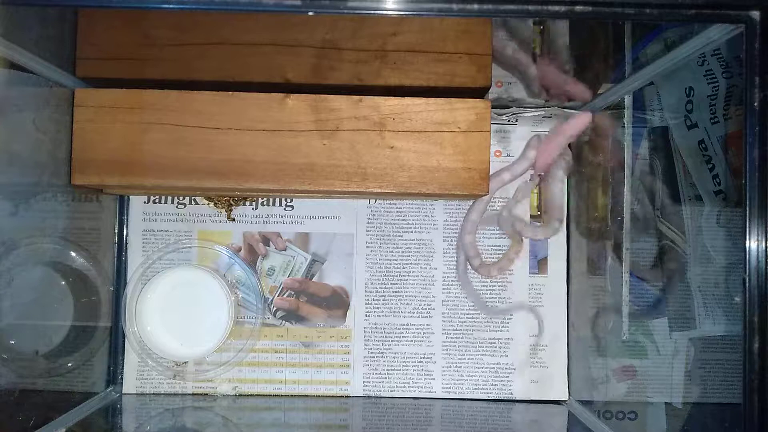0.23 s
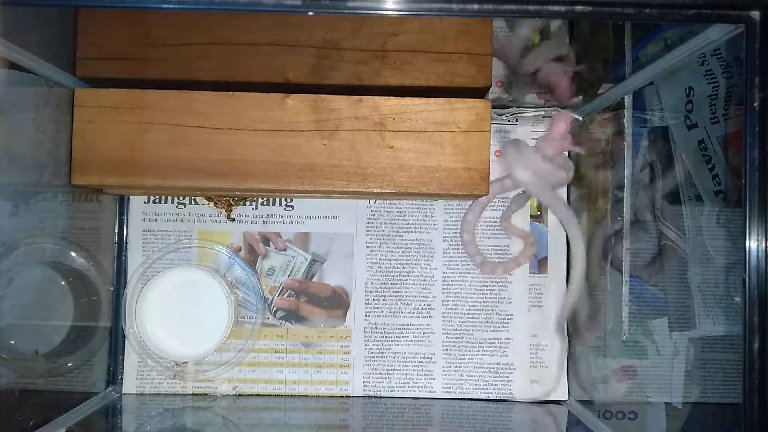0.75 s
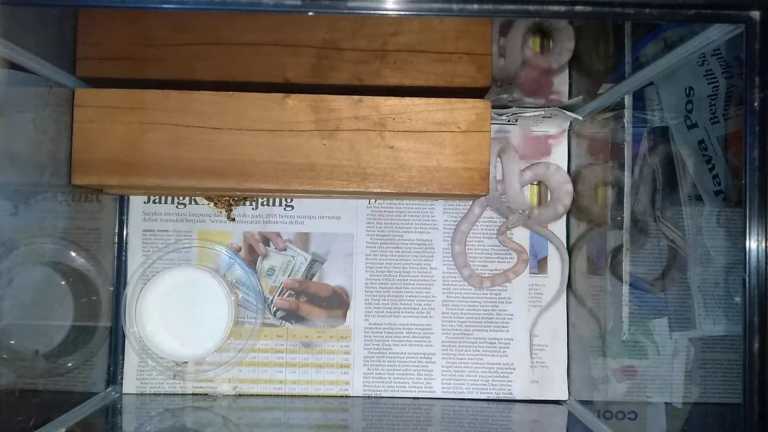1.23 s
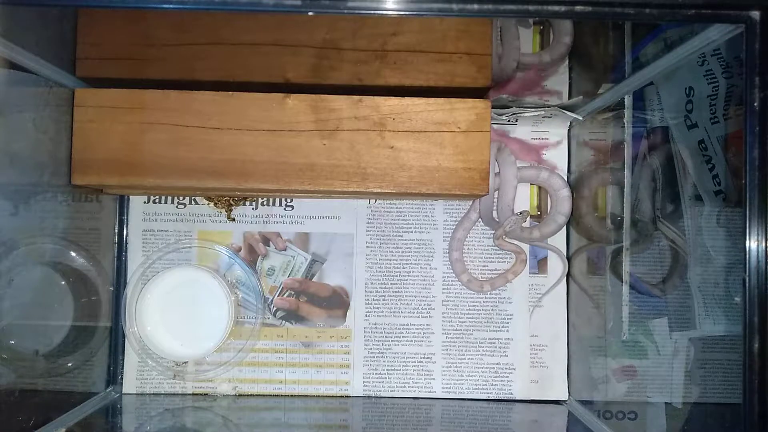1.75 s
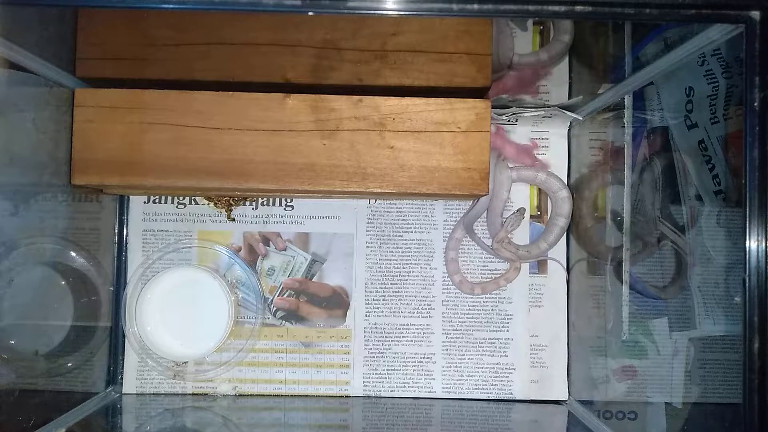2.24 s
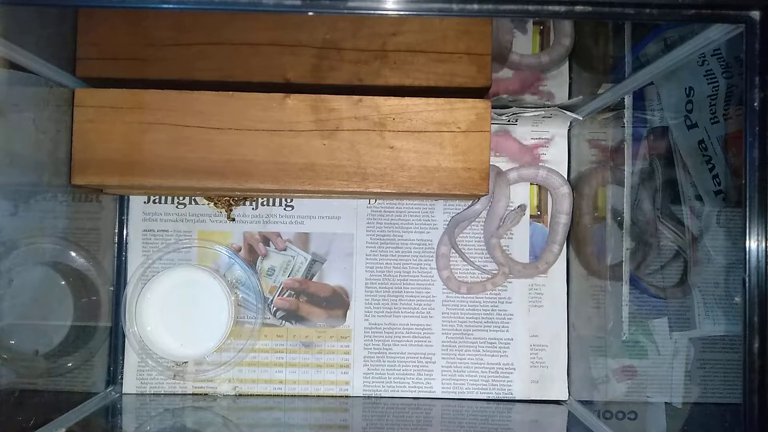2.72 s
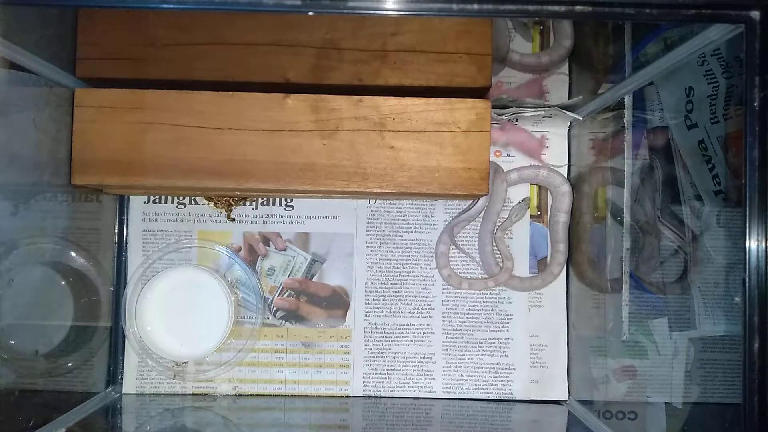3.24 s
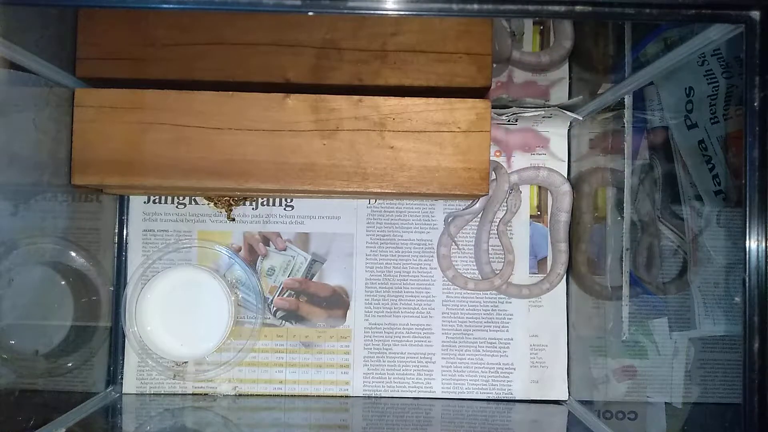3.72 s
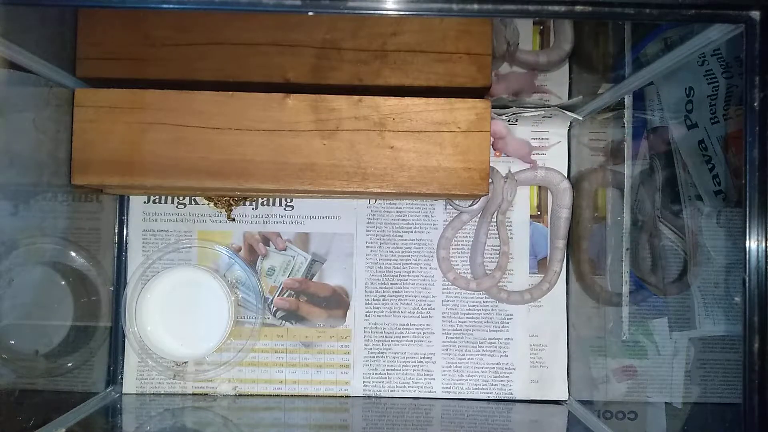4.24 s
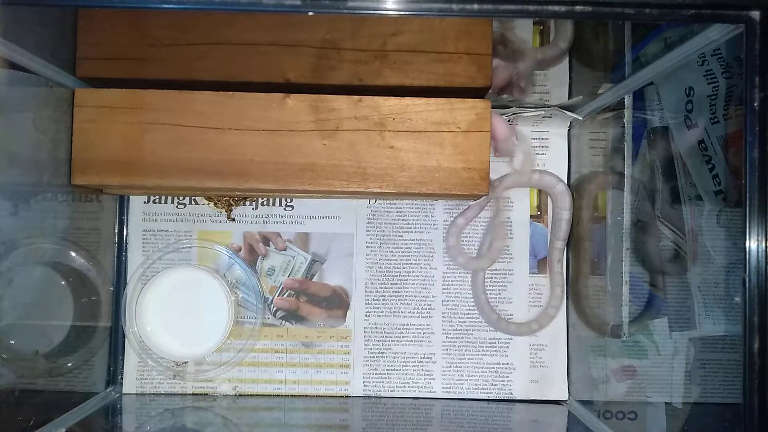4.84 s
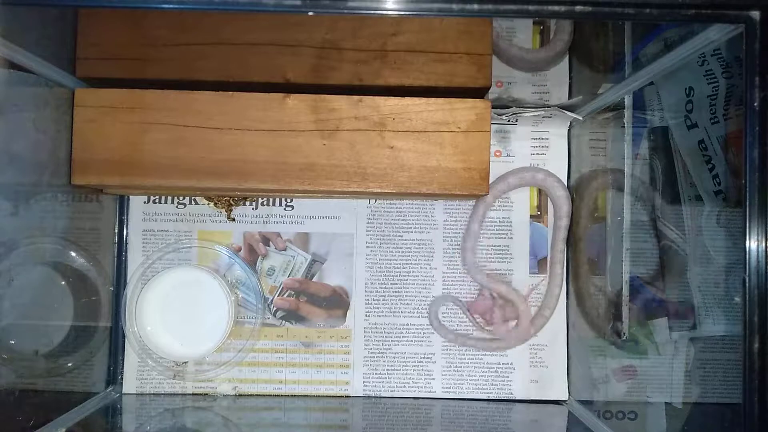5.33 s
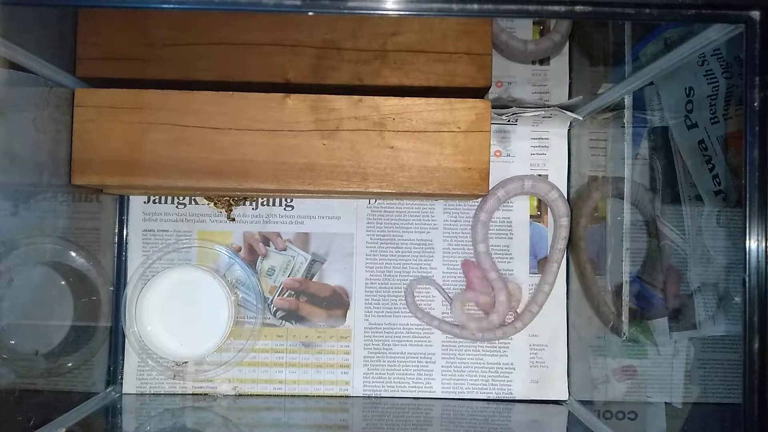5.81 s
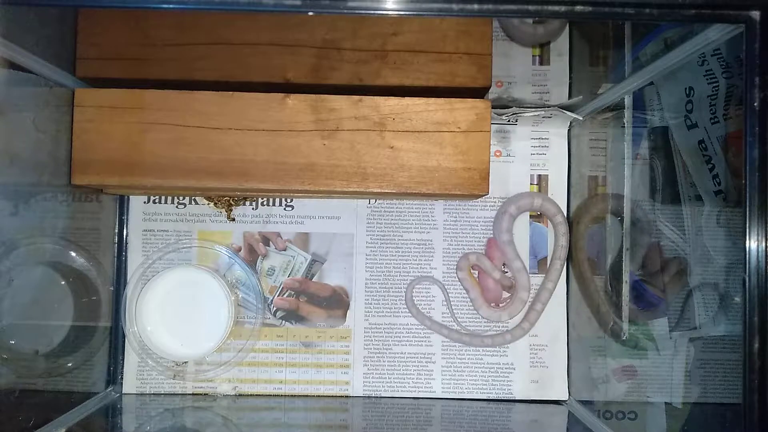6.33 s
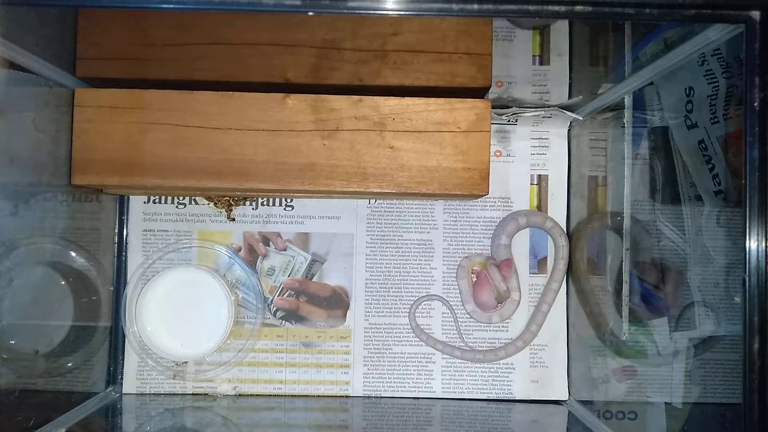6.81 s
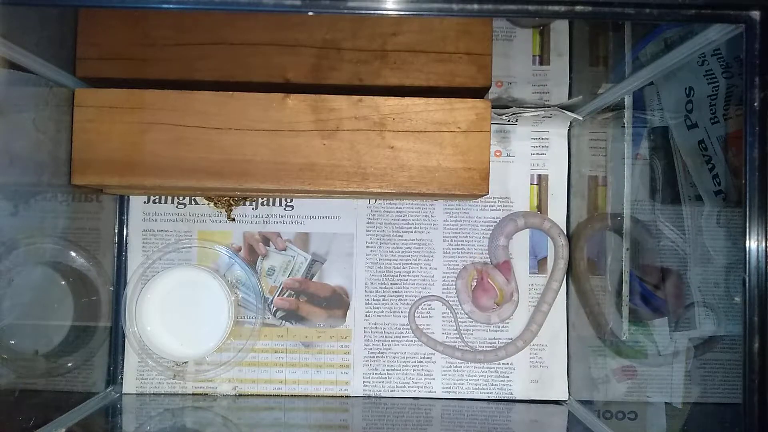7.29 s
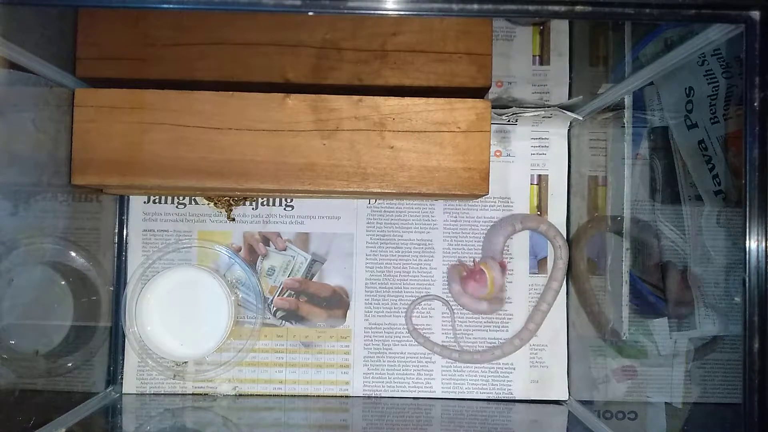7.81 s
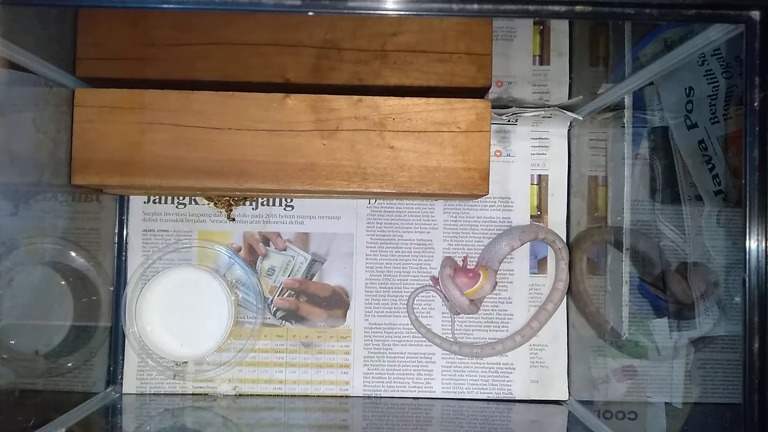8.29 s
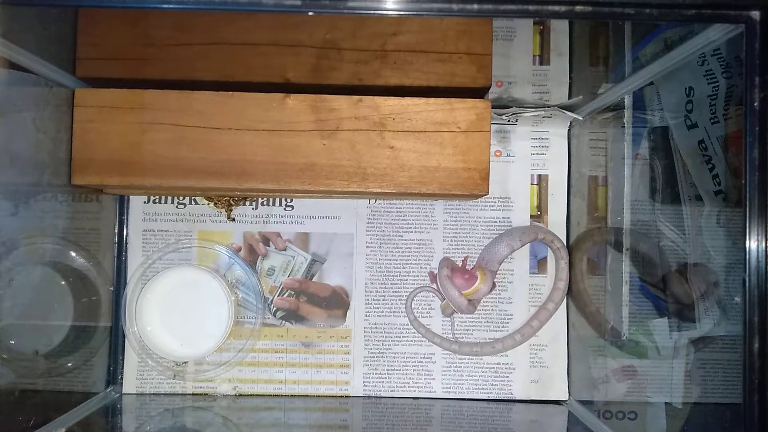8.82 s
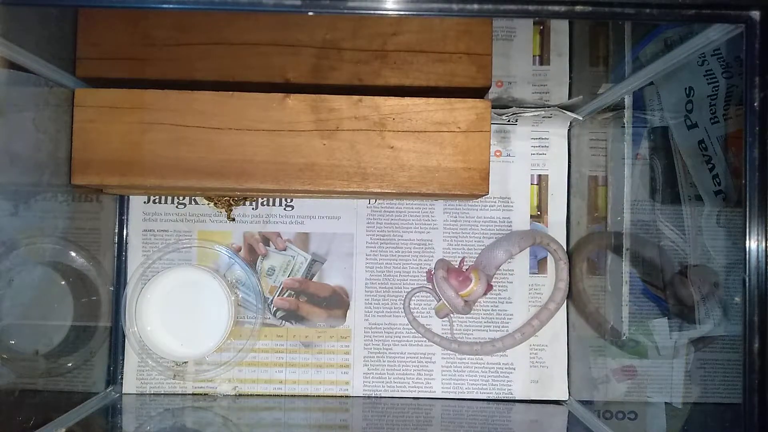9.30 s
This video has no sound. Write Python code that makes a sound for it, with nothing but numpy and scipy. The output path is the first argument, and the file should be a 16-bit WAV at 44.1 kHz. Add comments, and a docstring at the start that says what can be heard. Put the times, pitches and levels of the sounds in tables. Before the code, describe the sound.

Dry paper rustles and soft bumps in a glass tank, then a baby rat gives seven high, hoarse squeals.

```python
"""Snake and rat pup in a glass tank

A snake seizes a baby rat on a lining of newspaper. Over a low room rumble, bodies slide on the sheet,
claws scratch, creases snap, and the two scuff the wall and bump the floor. Then the pup squeals seven
times: each cry starts hoarse, thins to a whistle and rings between the panes; most end in a rasp."""
import sys
import numpy as np
from scipy import signal
from scipy.fft import rfft, irfft, next_fast_len
from scipy.io import wavfile
from scipy.ndimage import uniform_filter1d

SR = 44100
rng = np.random.default_rng(int(sys.argv[2]) if len(sys.argv) > 2 else 0)


def wav_out(sig):
    """Save sig, one row per channel (or a flat mono array), as 16-bit PCM at SR to the path in sys.argv[1]."""
    wavfile.write(sys.argv[1], SR, np.round(np.clip(np.atleast_2d(sig).T, -1, 1) * 32767).astype(np.int16))


N = 421151
TIME = np.arange(N) / SR
FREQS = np.maximum(np.fft.rfftfreq(N, 1 / SR), 1)

# the pup's cries: hoarse onset/s, hoarse ending/s, hoarseness between/0-1, second partial/dB,
# upper partials/dB, contour as (t/s, f/Hz, level/dB)
CRIES = [ (0.0456, 0.00022, 0.017, -3.5, -3, [(5.36, 1300, -36.5), (5.395, 2540, -35.5), (5.43, 3184, -34),
         (5.49, 3407, -37), (5.55, 3250, -38.5), (5.62, 3220, -38.5), (5.67, 3336, -31),
         (5.71, 3164, -34)]), (.04, 0.047, 0.137, 1.5, 4, [(5.845, 2653, -37.5), (5.9, 3448, -31),
         (5.985, 3570, -29), (6.02, 3270, -27.5), (6.045, 2653, -32), (6.075, 2447, -35)]),
         (0.028, 0, 0.03, -5.5, -6, [(6.207, 1358, -44), (6.243, 3567, -36.5), (6.32, 3737, -34.5),
         (6.385, 3168, -35), (6.49, 3170, -32), (6.55, 2837, -25), (6.63, 2955, -24), (6.695, 3390, -29),
         (6.755, 2853, -23), (6.775, 2886, -41)]), (0.031, .04, 0.056, 2.5, -4, [(6.952, 1287, -44.5),
         (7.0, 3204, -27.5), (7.07, 3057, -45), (7.1, 3648, -27), (7.15, 3655, -20), (7.23, 3550, -44.5),
         (7.3, 3567, -32), (7.35, 3262, -30), (7.385, 2700, -49.5)]),
         (0.0492, 0.00037, 0.073, 6.5, -6, [(7.535, 2910, -34.5), (7.62, 3463, -41.5), (7.68, 3610, -28.5),
         (7.73, 3526, -39), (7.8, 3703, -28.5), (7.83, 3152, -28.5), (7.86, 3053, -38)]),
         (0.0444, 0.049, 0.376, 4, -6.5, [(8.068, 2190, -45.5), (8.11, 2810, -42.5), (8.15, 3050, -34),
         (8.17, 2820, -31), (8.225, 2513, -38), (8.28, 1937, -39)]),
         (0.037, 0.035, 0.35, 3, -2.5, [(8.548, 1896, -41), (8.6, 2075, -37), (8.64, 2010, -53.5),
         (8.665, 2407, -38), (8.71, 2400, -39), (8.755, 2565, -31.5), (8.785, 2035, -38.5),
         (8.82, 1767, -41.5)])]


def from_db(db):
    """Decibels to gain."""
    return 10 ** (np.asarray(db) / 20)


def rms_one(x):
    """Scale to unit power."""
    return x / np.sqrt(np.mean(x ** 2) + 1e-20)


def at_hz(points, hz):
    """Read a spectrum on a log-frequency axis."""
    f, value = np.transpose(points)
    return np.interp(np.log(hz), np.log(f), value)


def filtered(x, order, hz, kind):
    """Butterworth filter."""
    return signal.sosfilt(signal.butter(order, hz, kind, fs=SR, output="sos"), x)


def drift(hz):
    """Random wander up to about hz; rms 1."""
    size = next_fast_len(N, True)
    f = np.fft.rfftfreq(size, 1 / SR)
    return rms_one(irfft(rfft(rng.standard_normal(size)) / (1 + (f / hz) ** 4), size)[:N])


def noise(colour):
    """Noise coloured by (f/Hz, level/dB) points, rolling off beyond them; rms 1."""
    ends = 1 / (1 + (colour[0][0] / FREQS) ** 4) / (1 + (FREQS / colour[-1][0] / 2) ** 4)
    return rms_one(irfft(rfft(rng.standard_normal(N)) * from_db(at_hz(colour, FREQS)) * ends, N))


def swell(start, length, rise, fall):
    """An envelope that builds, holds and dies away; times in seconds."""
    up = np.clip((TIME - start) / rise, 0, 1)
    return up * np.exp(-np.clip((TIME - start - length) / fall, 0, 20))


def clicks(rows):
    """One impulse for each (t/s, level/dB) row."""
    out = np.zeros(N)
    for s, db in rows:
        out[int(s * SR)] = from_db(db)
    return out


def ring(drive, hz, t60):
    """One mode: a click sets a decaying sine ringing."""
    r, w = from_db(-60 / (t60 * SR)), 2 * np.pi * hz / SR
    return signal.lfilter([0, np.sin(w)], [1, -2 * r * np.cos(w), r * r], drive + 1e-18)


def tank(x, pan, direct_db, t60):
    """Direct sound and dense reflections between the panes, panned by frequency."""
    t = TIME[:SR // 2]
    response = rng.standard_normal((2, len(t))) * from_db(-60 * t / t60)
    response /= np.linalg.norm(response, axis=1, keepdims=True)
    response[[0, 1], [0, 10]] += from_db(direct_db)  # arrives on the left first
    heard = signal.fftconvolve(x[None], response / np.linalg.norm(response[0]), axes=1)[:, :N]
    shares = from_db(at_hz(pan, FREQS) * np.array([[.5], [-.5]]))
    return irfft(rfft(heard) * shares / np.sqrt(np.mean(shares ** 2, axis=0)), N)


def room(rumble_db, steady_db, air_db):
    """Room tone: a near-centred rumble that wavers more when faint, under a wide, soft hiss."""
    # the rumble's rise and fall: t/s, level/dB
    rumble_ride = [(0, -64.5), (1.2, -49), (1.6, -61.5), (3.8, -68.5), (4.9, -52), (8.5, -57.5),
                   (8.9, -66.5), (9.5, -60.5)]
    # colour of the rumble: f/Hz, level/dB
    rumble_colour = [(35, -19), (60, 7), (88, -3), (122, 2), (190, -4.5), (245, -11), (400, -19)]
    # colour of the hiss: f/Hz, level/dB
    air_colour = [(400, -2), (700, -7.5), (1600, -12.5), (6000, -18), (9000, -15), (15500, -18.5)]
    level = np.interp(TIME, *np.transpose(rumble_ride))
    waver_db = np.clip(steady_db - level, 0, 10)
    rumble = noise(rumble_colour) + from_db(-11.5) * noise(rumble_colour) * [[1], [-1]]
    rumble *= from_db(level + rumble_db + waver_db * np.minimum(drift(9.1), 1))
    hiss = noise(air_colour) + from_db(-1) * noise(air_colour) * [[1], [-1]]
    return rumble + from_db(air_db) * hiss


def bumps(level_db, knock_db):
    """Each soft bump rings the tank floor's modes, with a dull knock on top."""
    # blows on the floor: t/s, level/dB
    hits = [(0.725, -40), (0.752, -36.5), (5.036, -43), (5.056, -41), (5.335, -53.5), (7.532, -57.5)]
    # floor modes: f/Hz, level/dB, t60/s
    modes = [(121, 4, 0.53), (231.4, 7, 0.23), (272.8, 8, 0.21), (310, -7.5, 0.79)]
    blows = clicks(hits)
    body = sum(from_db(db) * ring(blows, hz, t60) * (-1) ** k for k, (hz, db, t60) in enumerate(modes))
    contact = sum(from_db(db) * swell(s, 0.0017, 0.015, 0.0063) for s, db in hits)
    knock = noise([(100, 21.5), (300, 1.0), (600, -7.0)]) * contact
    return from_db(level_db) * body + from_db(knock_db) * knock


def scuffs(level_db, grain_db, rise, fall):
    """A body rubs hard along the wall and leaves the pane ringing faintly."""
    # rubs on the glass: t/s, length/s, level/dB
    rubs = [(0.859, 0.039, -32), (0.915, 0.0092, -37), (1.082, 0.071, -49.5)]
    # colour of the rub: f/Hz, level/dB
    colour = [(400, -2), (800, -2.5), (1000, -18.5), (1450, -3.5), (2200, -3), (3000, 4.5), (4000, -5),
              (4700, -2), (7800, -2.5), (11000, -19), (15000, -25)]
    # pane modes: f/Hz, level/dB, t60/s
    pane = [(791, -57, .6), (1163, -61, .6), (1459, -58, 1.1), (2745, -44, .13)]
    force = sum(from_db(db) * swell(s, length, rise, fall) for s, length, db in rubs)
    rub = force * noise(colour) * from_db(level_db + grain_db * drift(230))
    return rub + sum(from_db(db) * ring(rub, hz, t60) for hz, db, t60 in pane)


def scratches(grain_db, grain_hz, band_hz):
    """Small claws scrape over the sheet in uneven ticks."""
    # claw strokes: t/s, length/s, level/dB
    scrapes = [(3.188, 0.16, -65.5), (3.825, 0.069, -59), (4.48, 0.17, -68.5), (2.92, 0.036, -60)]
    force = sum(from_db(db) * swell(s, length, length / 2, length / 10) for s, length, db in scrapes)
    ticks = rng.standard_normal(N) * from_db(grain_db * np.minimum(drift(grain_hz), 2))
    return force * rms_one(filtered(ticks, 2, band_hz, "band"))


def snaps(level_db, width, t60):
    """Paper creases buckle with tiny dry cracks, each at its own pitch."""
    # buckling creases: t/s, level/dB, f/Hz
    creases = [(0.222, -38.5, 9700), (0.4105, -37.5, 2570), (1.669, -45, 8700), (3.3355, -44.5, 3560),
               (4.678, -50, 3380), (4.84, -42.5, 3960), (7.5312, -39.5, 1815)]
    t, out = TIME[:SR // 20], 0
    for s, db, hz in creases:
        burst = rng.standard_normal(len(t)) * from_db(-60 * t / t60)
        crack = filtered(burst, 1, [hz / (1 + width), min(hz * (1 + width), SR / 3)], "band")
        out = out + signal.oaconvolve(clicks([(s, db + level_db)]), crack)[:N]
    return out


def paper(level_db, grain_db, grain_hz, catch_db, crackles_per_s, crackle_db, split_hz, rest_db, fall):
    """Scales catch and slip on the sheet in tiny grains while its fibres crackle."""
    # colour of paper friction: f/Hz, level/dB
    colour = [(300, -12), (800, 3.5), (1800, -0.5), (2800, 7), (4100, 8.5), (5200, -1), (8500, 6.5),
              (15500, 2)]
    # bodies sliding: t/s, length/s, level/dB, treble over mids/dB
    strokes = [(0.036, 0.17, -60, 7.5), (0.149, 0.16, -55, 17), (0.387, 0.13, -47.5, 12.5),
               (0.466, 0.18, -59, 9.5), (1.583, 0.11, -53.5, 9.5), (1.89, 0.074, -51.5, 11),
               (2.283, 0.024, -46.5, 14), (2.366, 0.083, -50.5, 10.5), (2.708, 0.088, -58, 6.5),
               (2.97, 0.059, -63, 11), (3.329, 0.12, -60.5, 23), (3.524, 0.081, -52.5, 4.5),
               (3.636, 0.075, -56, 7), (3.713, 0.07, -53, 9.5), (3.982, 0.022, -61, -8),
               (4.128, 0.1, -65, 15), (4.311, 0.035, -62, 10), (4.404, 0.022, -61, 10),
               (4.827, 0.081, -52.5, 42), (5.026, 0.12, -54.5, 5.5), (5.39, 0.2, -60, -25),
               (9.098, 0.039, -52.5, 49)]
    crackle = rms_one((rng.random(N) < crackles_per_s / SR) * rng.standard_normal(N))
    crackle = filtered(crackle, 1, colour[3][0], "high")
    grains = noise(colour) * rms_one(from_db(grain_db * drift(grain_hz)))
    catch = rms_one(from_db(catch_db * np.clip(drift(32.5), -1, 1)))
    friction = (grains + from_db(crackle_db) * crackle) * catch
    mids, treble = (rms_one(filtered(friction, 2, split_hz, kind)) for kind in ("low", "high"))
    first_cry_s = CRIES[0][-1][0][0]
    out = from_db(rest_db) * grains * (TIME < first_cry_s)  # faint rustle between strokes
    for s, length, db, bright_db in strokes:
        tilt = from_db(bright_db)
        slide = (mids - tilt * treble) / np.hypot(1, tilt)
        out += from_db(db + level_db) * swell(s, length, length * .5, fall) * slide
    return out


def cry_contours(attack_s, release_s, break_s):
    """Control curves for the voice: each cry breaks from rasp into whistle, and most break back."""
    controls, gate = np.zeros((5, N)), 0
    for k, (onset_s, ending_s, between, second_db, upper_db, contour) in enumerate(CRIES):
        s, hz, db = np.transpose(contour)
        hoarse = np.clip((s[0] + onset_s - TIME) / break_s + .5, between, 1)
        if ending_s > 0:
            hoarse = np.maximum(hoarse, np.clip((TIME - s[-1] + ending_s) / break_s + .5, 0, 1))
        pitch, effort_db = np.interp(TIME, s, hz), np.interp(TIME, s, db)
        cry = [pitch, effort_db, hoarse, np.full(N, second_db), np.full(N, upper_db)]
        controls = np.where((TIME >= s[0]) | (k == 0), cry, controls)
        gate = gate + swell(s[0], s[-1] - s[0], attack_s, release_s)
    return (*controls, gate)


def squeals(level_db, wobble, jitter, flutter_db, easy_db,
            chaos, chaos_hz, shimmer, growl_db, rasp_db, sputter_db):
    """Partials through the throat; when hoarse, each shakes in pitch and strength and smears to rasp."""
    # resonance of throat and mouth: f/Hz, level/dB
    throat = [(1200, -20.5), (2300, -18.5), (3200, -13.5), (3750, -17), (4800, -13), (6200, -9.5),
              (7300, -6), (8700, 7.5), (10900, -3), (12000, -8), (14500, -10), (16000, -22.5)]
    pitch, effort_db, hoarse, second_db, upper_db, gate = cry_contours(
        attack_s=.016, release_s=.006, break_s=.025)
    pitch = pitch * (1 + wobble * drift(24.13) + jitter * drift(163) + chaos * hoarse * drift(chaos_hz))
    phase = 2 * np.pi * np.cumsum(pitch) / SR
    partials = [np.sin(k * phase) * (k * pitch < SR / 2) * (1 + shimmer * hoarse * drift(chaos_hz))
                for k in range(1, 9)]
    # in a clear voice, more effort favours the overtones over the fundamental
    fundamental = partials[0] * from_db((0.5 - hoarse) * (easy_db - effort_db) + growl_db * hoarse)
    upper = from_db(upper_db) * sum(partials[3:])
    folds = fundamental + from_db(second_db) * partials[1] + partials[2] + upper
    voice = irfft(rfft(folds) * from_db(at_hz(throat, FREQS)), N)
    voice /= np.sqrt(uniform_filter1d(voice ** 2, size=400) + 1e-9)  # even out the level
    voice += from_db(rasp_db) * hoarse * noise(throat)  # turbulence, coloured by the throat too
    voice *= from_db(sputter_db * hoarse * (np.minimum(drift(190), 2) - .5))
    return voice * np.minimum(gate, 1) * from_db(effort_db + level_db + flutter_db * drift(60))


def scene():
    """The pup and the struggle ring in the tank, over floor bumps and room tone."""
    # stereo placement of the pup: f/Hz, left minus right/dB
    pup_pan = [(5500, -2.5), (7200, -7), (8300, -22), (9500, -4), (11000, 7), (12500, 9)]
    # stereo placement of the paper: f/Hz, left minus right/dB
    paper_pan = [(4000, -0.5), (7500, -5.5), (12500, 8.5)]
    voice = squeals(level_db=-1.5, wobble=.006, jitter=.013, flutter_db=2.5, easy_db=-35,
                    chaos=.04, chaos_hz=480, shimmer=1.2, growl_db=4, rasp_db=-11, sputter_db=3)
    pup = tank(voice, pup_pan, direct_db=-3, t60=0.23)
    rustle = paper(level_db=4.5, grain_db=3, grain_hz=563, catch_db=5, crackles_per_s=160,
                   crackle_db=-1, split_hz=6930, rest_db=-73, fall=0.0018)
    claws = scratches(grain_db=10, grain_hz=190, band_hz=(2920, 5060))
    sheet = tank(rustle + claws, paper_pan, direct_db=-7.5, t60=0.21)
    creases = tank(snaps(level_db=4.5, width=0.49, t60=0.039), paper_pan, direct_db=1.5, t60=0.22)
    rub = scuffs(level_db=1.5, grain_db=-1, rise=0.02, fall=0.026)
    wall = tank(rub, pan=[(3000, -5), (7000, -11), (12000, 4)], direct_db=2.5, t60=0.3)
    floor = bumps(level_db=-8.5, knock_db=6.5)
    return pup + sheet + creases + wall + floor + room(rumble_db=-8.5, steady_db=-49.5, air_db=-72)


def record(dry):
    """A steep low-pass takes off the very top."""
    cutoff_hz = 15850
    return signal.sosfilt(signal.ellip(12, .1, 80, cutoff_hz, fs=SR, output="sos"), dry)


dry = scene()
out = record(dry)
wav_out(out)
```